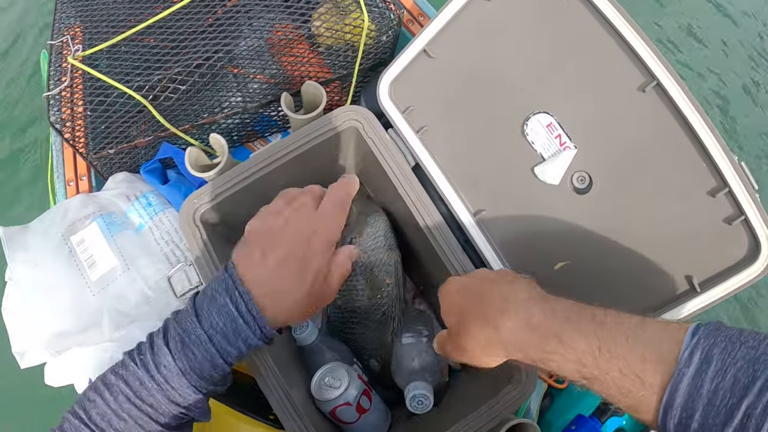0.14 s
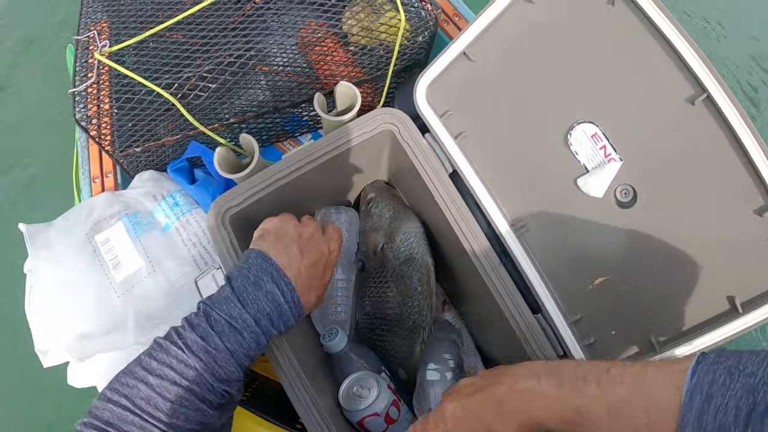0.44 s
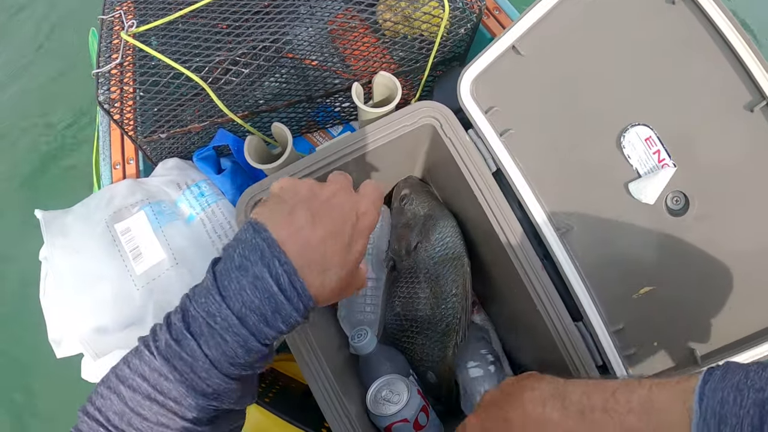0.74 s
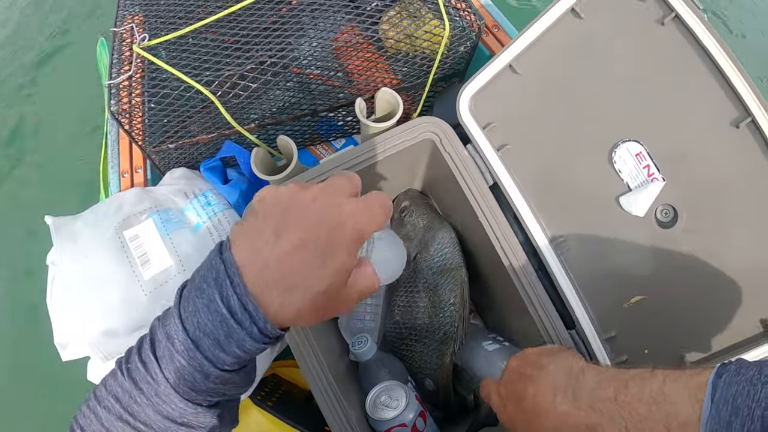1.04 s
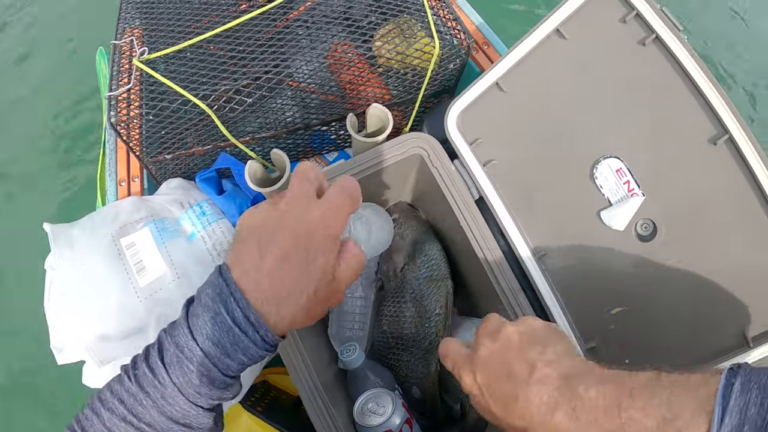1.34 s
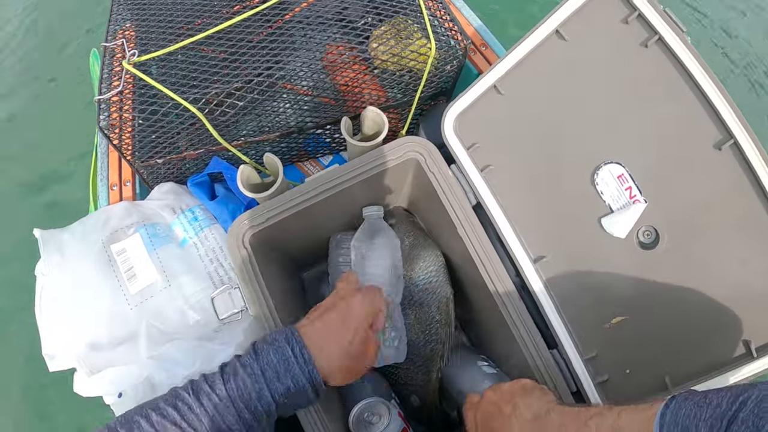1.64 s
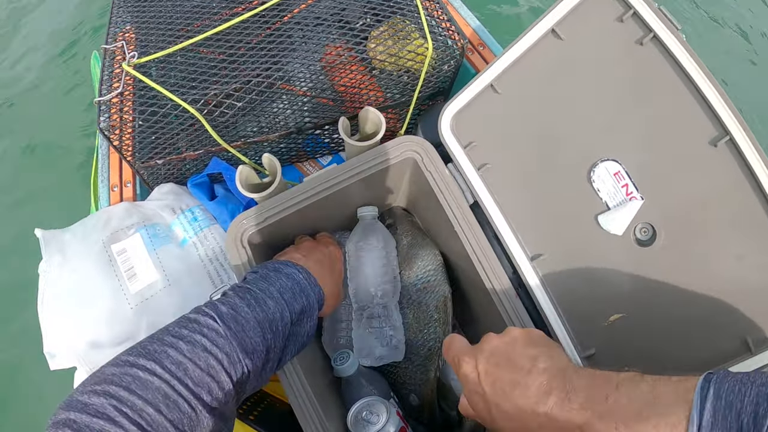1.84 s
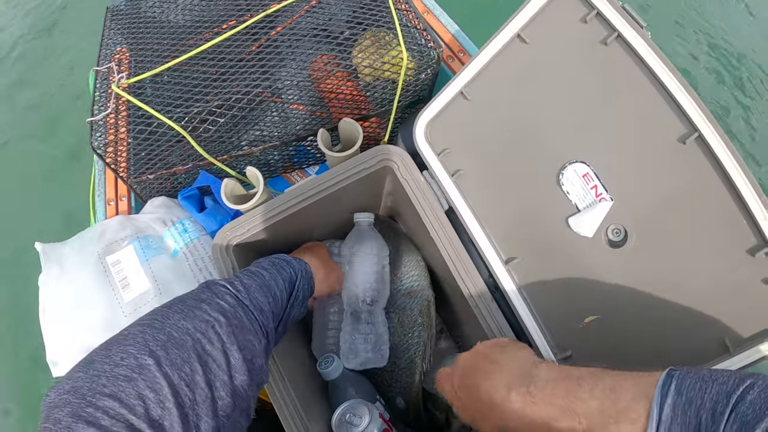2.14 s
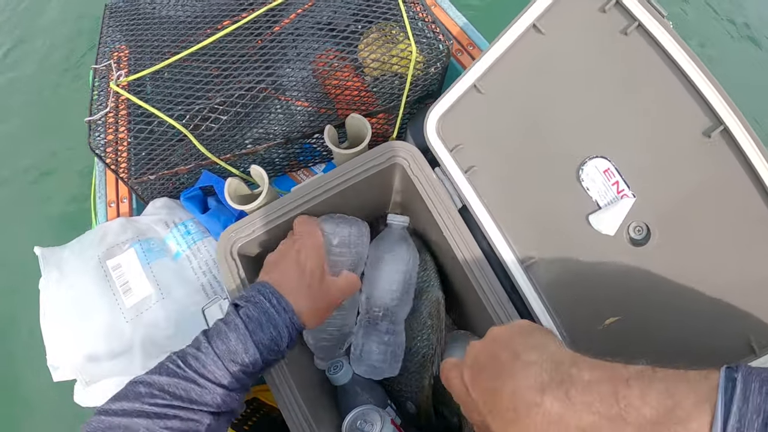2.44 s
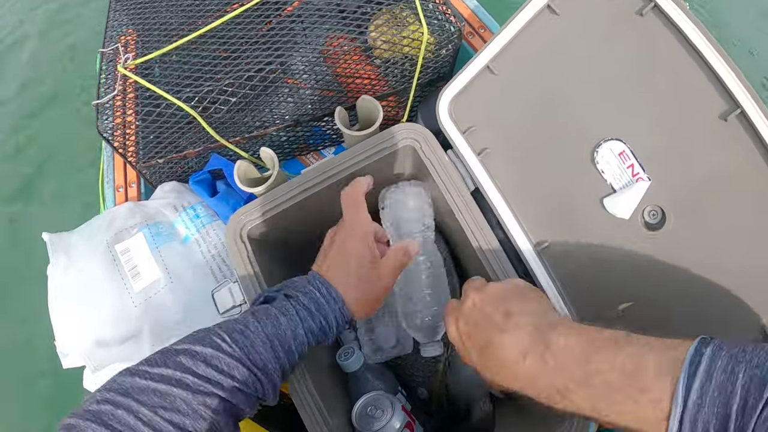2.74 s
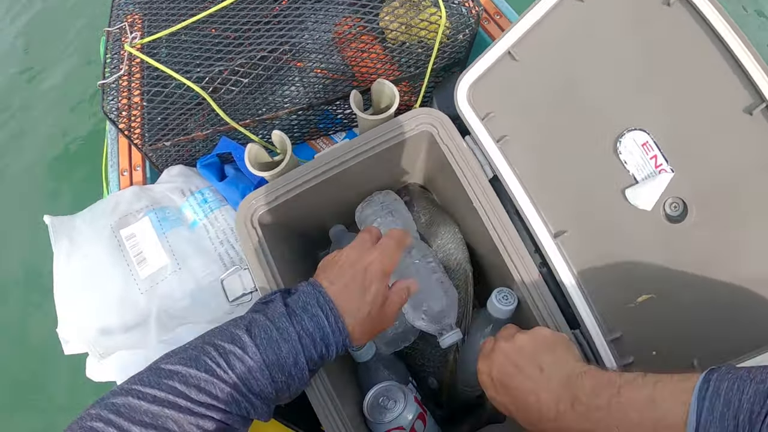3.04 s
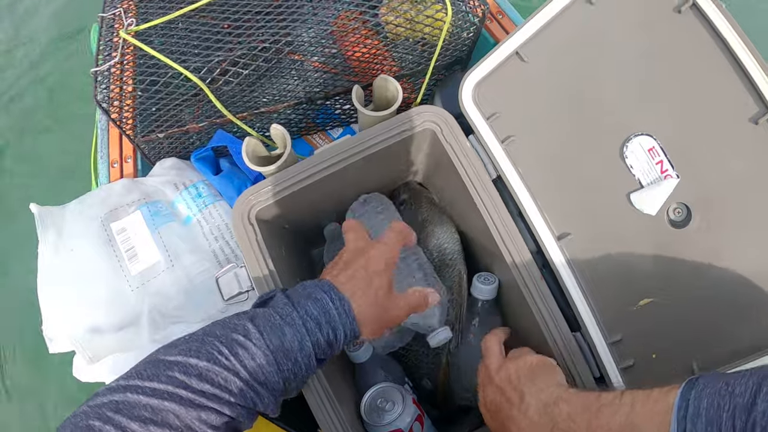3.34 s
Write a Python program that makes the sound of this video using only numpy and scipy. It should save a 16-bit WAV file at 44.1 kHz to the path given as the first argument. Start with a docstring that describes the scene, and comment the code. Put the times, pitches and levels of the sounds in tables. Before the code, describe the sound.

Crackling plastic bottles and ice shoved around a cooler, with hollow knocks and wind buffeting.

```python
"""Plastic snaps and knocks over wind rumble: hands shift frozen bottles and ice in a cooler on a small boat.
Bottle walls buckle and snap, bottles crunch over ice and knock the cooler's panels, empty ones ring hollow.
A small air pump purrs nearby; hull and water murmur below it.
Wind buffets the two microphone ports of a head-worn camera, the left one most."""
import sys
import numpy as np
from scipy import signal
from scipy.fft import rfft, irfft, next_fast_len
from scipy.io import wavfile
from scipy.ndimage import map_coordinates

SR = 44100
rng = np.random.default_rng(int(sys.argv[2]) if len(sys.argv) > 2 else 0)


def pcm_store(signal):
    """Save signal as 16-bit PCM."""
    levels = np.round(np.clip(np.atleast_2d(signal), -1, 1) * 32767)
    wavfile.write(sys.argv[1], SR, levels.astype(np.int16).T)


N = 154350

# hull and water spectrum: f/Hz, level/dB
WATER_SPECTRUM = [(18, -40), (30, -3), (130, 1), (216, -7.5), (400, -16.5), (880, -120)]
# wind strength: t/s, level/dB
GUSTS = [(0, -34), (.06, -24), (.3, -50.5), (.6, -35), (.95, -38), (1.15, -23.5), (1.32, -25), (1.52, -30),
         (1.65, -27), (1.98, -27.5), (2.2, -28.5), (2.4, -23), (2.64, -30), (2.72, -18.5), (2.95, -28.5),
         (3.05, -17.5), (3.5, -24.5)]
# turbulence spectrum at a port: f/Hz, level/dB
BUFFET_SPECTRUM = [(10, -22), (28, -1.5), (43, -2.5), (70, -8), (150, -23.5), (400, -42.5), (900, -120)]
# pump housing resonances: f/Hz, width/Hz, level/dB
HOUSING_MODES = [(100, 29, 8.5), (200, 76, 3.5), (477.6, 13.7, 6), (1074, 66, 0.5), (2990, 200, -10.5)]
# valve hiss spectrum: f/Hz, level/dB
VALVE_SPECTRUM = [(290, -62), (500, -3), (974, -7.5), (2690, -9), (16000, -42)]
# bottles sliding over ice: t/s, length/s, level/dB, treble/dB
SLIDES = [(0.162, 0.066, -25.5, -1.5), (0.432, 0.11, -33.5, -7.5), (1.562, 0.1, -31, -3.5),
          (1.606, 0.18, -22, -1), (1.764, 0.17, -37.5, -1.5), (1.92, 0.18, -42, 3), (2.217, 0.37, -34, -11),
          (2.677, 0.095, -29, -9), (2.754, 0.053, -18.5, 0.5), (2.854, 0.16, -19.5, -3.5),
          (2.987, 0.19, -23.5, -3.5), (3.091, 0.35, -35.5, 2), (3.31, 0.29, -48.5, 9)]
# ice crunch spectrum: f/Hz, level/dB
CRUNCH_SPECTRUM = [(88, -31), (150, -4.5), (341, -4.5), (514, -10.5), (1020, -11.5), (1940, -14),
                   (3490, -15.5), (12000, -37)]
# empty bottles ringing: t/s, level/dB, f/Hz
POPS = [(2.048, -18.5, 1140), (2.688, -14.5, 1485)]
# bottles hitting the cooler: t/s, level/dB, f/Hz (push, before PUSH_PITCH_RATIO), ring/dB
KNOCKS = [(0.128, -2, 200, -9.5), (0.404, -7.5, 155.3, -9.5), (0.646, -14, 555, -13),
          (1.37, -6.5, 215, -14), (1.65, -12, 204, -12), (1.978, -10, 190, -13), (2.043, -10.5, 272, -15),
          (2.061, -16, 198, -17), (2.154, -19, 222, -13), (2.261, -14, 141, -9.5), (2.543, -6, 216, -14),
          (2.611, -14.5, 196, -17.5), (2.688, -14.5, 393, -11), (2.758, -10.5, 258, -15),
          (2.799, -7, 255, -9.5), (3.014, -15, 158, -12.5)]
# cooler panel modes: f/Hz, level/dB, t60/s
COOLER_MODES = [(118, 3, 0.14), (214.6, -4, 0.13), (321, 7, 0.041), (445, -4.5, 0.072), (605, 0, 0.032)]
# bottle walls and ice snapping: t/s, level/dB, f/Hz, treble/dB, t60/s
SNAPS = [(0.1283, -3, 954, -24.5, 0.026), (0.404, -9, 946, -25, 0.038), (0.5526, -16.5, 1820, -14, 0.029),
         (0.5664, -12, 3080, -15, 0.032), (0.6397, -14, 1180, -31.5, 0.054), (0.6478, 3, 3060, -9.5, 0.018),
         (0.697, -21.5, 1120, -55, 0.013), (0.7469, -7.5, 1770, -43, 0.031),
         (0.7989, -18, 1160, -56, 0.027), (0.833, -12, 1210, -13, 0.019), (1.0037, -3, 1670, -17, 0.028),
         (1.0118, -11.5, 1680, -29, 0.016), (1.034, -19, 1560, -36, 0.064), (1.055, -4.5, 970, -12, 0.02),
         (1.1878, -18, 980, -55, 0.016), (1.291, -22.5, 2300, -36, 0.023), (1.3768, -16, 2560, -35, 0.027),
         (1.3946, -1.5, 2870, -7, 0.0077), (1.4, -4, 2380, -34, 0.026), (1.4273, -16.5, 1120, -53, 0.02),
         (1.544, -13, 2400, -5.5, 0.055), (1.5602, -7.5, 1720, -3.5, 0.028),
         (1.6192, -10.5, 1890, -46, 0.027), (1.635, -8, 1040, -51, 0.0071), (1.6515, -2.5, 1060, -16, 0.01),
         (1.6625, -2.5, 856, -7.5, 0.036), (1.6689, -3.5, 2000, -40, 0.023), (1.6958, -3, 2460, -30, 0.025),
         (1.71, -16.5, 1870, -14, 0.056), (1.7245, -15, 2230, -6.5, 0.076),
         (1.7716, -16, 1070, -17.5, 0.025), (1.9789, -21, 1620, -16, 0.021), (2.0914, -21, 960, -49, 0.022),
         (2.136, -15, 870, -15.5, 0.016), (2.195, -14, 1570, -66, 0.021), (2.2622, -18.5, 850, -65, 0.031),
         (2.287, -21, 1530, -48, 0.023), (2.321, -11.5, 1640, -53, 0.026), (2.358, -12, 2300, -39, 0.029),
         (2.3693, -4, 1480, -70, 0.023), (2.4084, -16, 1670, -27, 0.038), (2.4778, -3.5, 1500, -11, 0.025),
         (2.5586, -1.5, 1990, -33, 0.017), (2.684, -11.5, 1160, -57, 0.043),
         (2.701, -15.5, 1050, -63, 0.027), (2.7141, -18, 920, -59, 0.035), (2.7587, -11.5, 980, -39, 0.043),
         (2.774, -16, 1460, -28, 0.047), (2.798, -19.5, 1040, -56, 0.085), (2.845, -3, 1980, -13, 0.05),
         (2.8781, -6, 2050, -18, 0.078), (2.906, -9.5, 1630, -15, 0.12), (2.924, -14.5, 1240, -46, 0.072),
         (2.9549, -14, 1490, -48, 0.027), (3.034, -1, 2130, 3, 0.021), (3.045, -11, 1720, -30, 0.051),
         (3.066, -12, 2430, -1, 0.026), (3.0724, -5.5, 1740, -14, 0.056), (3.0963, -5.5, 2950, -14, 0.031),
         (3.175, -13, 1910, -17, 0.03), (3.1994, -11.5, 2070, -7.5, 0.028),
         (3.2825, -17.5, 1950, -14, 0.06), (3.2991, -1, 2690, -14, 0.028), (3.433, -14.5, 994, -26, 0.031),
         (3.481, -6.5, 2730, -10.5, 0.031)]
# left port over right: f/Hz, level/dB
PORT_TILT = [(200, 0), (700, -2.5), (2400, .5), (8000, -6), (15000, -4)]
# left port behind right: f/Hz, lag/rad
PORT_LAG = [(100, 0), (1300, .35), (3400, 1), (15000, 2.2)]

HISS_DB, WATER_DB = -54, -36.5
WIND_LEFT_DB, WIND_RIGHT_DB, LUMP_DB, LUMP_RATE_HZ = 5.5, -1, 3.5, 19
PUMP_HZ, PUMP_DB, PUMP_JITTER, PUMP_SMEAR_RAD = 52.1, -41, 0.00065, 0.61
VALVE_DB, VALVE_T60_S = -3.5, 0.1
GRAIN_RATE_HZ, GRAIN_SPREAD_DB, GRAIN_T60_S, SLIDE_RISE_SHARE = 1100, 5, 0.014, 0.3
POP_T60_S = 0.045
SINK_S, PUSH_CREST_CYCLES, PUSH_PITCH_RATIO = 0.0021, 0.69, 1.184
SNAP_Q, SNAP_RISE_S, SNAP_BROAD_DB, SNAP_TREBLE_HZ, SNAP_LOW_CUT_HZ = 9, 0.0015, -7, 4650, 477
CRACK_DB, CRACK_DELAY_S, CRACK_WIDTH_S = 2.5, 0.001202, 0.00006
SCATTER_DB, SCATTER_T60_S, SCATTER_LOW_CUT_HZ = -1, 0.01, 4500
MIC_ROLLOFF_HZ, BAND_LIMIT_HZ = 7220, 16000


def amp(db):
    """dB to gain."""
    return 10 ** (np.asarray(db) / 20)


def unit_rms(x):
    """Scale to rms 1."""
    return x / np.sqrt(np.mean(x ** 2) + 1e-20)


def log_interp(points, hz):
    """Read (f/Hz, value) points on a log axis."""
    f, value = np.transpose(points)
    return np.interp(np.log(hz + 1), np.log(f + 1), value)


def columns(table):
    """Column vectors, one row per event."""
    return np.transpose(table)[:, :, None]


def wobble(rate_hz):
    """Smooth random curve, rate_hz knots a second."""
    knots = rng.standard_normal(int(N * rate_hz / SR) + 4)
    return map_coordinates(knots, [np.arange(N) * rate_hz / SR])


def filtered(x, response):
    """Apply a complex frequency response."""
    size = next_fast_len(x.shape[-1] + 4096)
    return irfft(rfft(x, size) * response(np.fft.rfftfreq(size, 1 / SR)), size)[..., :x.shape[-1]]


def resonance(f, hz, width_hz):
    """Causal band-pass response."""
    return 1j * f * width_hz / (hz * hz - f * f + 1j * f * width_hz)


def coloured(x, spectrum):
    """Shape by (f/Hz, level/dB) points, rms 1."""
    return unit_rms(filtered(x, lambda f: amp(log_interp(spectrum, f))))


def place(starts_s, sounds):
    """Sum short sounds into the track."""
    index = np.round(starts_s * SR).astype(int).reshape(-1, 1) + np.arange(sounds.shape[1])
    return np.bincount(index.ravel(), sounds.ravel(), N + sounds.shape[1])[:N]


def water():
    """Low, steady murmur of hull and water."""
    return amp(WATER_DB) * coloured(rng.standard_normal(N), WATER_SPECTRUM)


def wind():
    """Lumpy low buffeting, different at each port."""
    gust_db = np.interp(np.arange(N) / SR, *np.transpose(GUSTS))
    return np.array([amp(gust_db + port_db + LUMP_DB * wobble(LUMP_RATE_HZ))
                     * coloured(rng.standard_normal(N), BUFFET_SPECTRUM)
                     for port_db in (WIND_LEFT_DB, WIND_RIGHT_DB)])


def pump():
    """One stroke a turn shakes the housing, overtones out of step; the valve hisses with each stroke."""
    turns = np.cumsum(PUMP_HZ * (1 + PUMP_JITTER * wobble(6.6))) / SR
    strokes = np.diff(np.floor(turns), prepend=0)
    overtone_rad = PUMP_SMEAR_RAD * rng.standard_normal(SR // 100)

    def housing(f):
        modes = sum((-1) ** k * amp(db) * resonance(f, hz, width_hz)
                    for k, (hz, width_hz, db) in enumerate(HOUSING_MODES))
        phase_rad = np.interp(f / PUMP_HZ, np.arange(len(overtone_rad)), overtone_rad)
        return modes / (1 + (f / 4000) ** 4) * np.exp(1j * phase_rad)

    purr = unit_rms(filtered(strokes, housing))
    puffs = amp(-60 * (turns % 1) / PUMP_HZ / VALVE_T60_S) + 0.075
    valve = coloured(puffs * rng.standard_normal(N), VALVE_SPECTRUM)
    return amp(PUMP_DB) * (purr + amp(VALVE_DB) * valve)


def ice_crunch():
    """Dense tiny fractures and scrapes swell and fade with each slide; bare ice scrapes brighter."""
    t = np.arange(N) / SR
    fractures = (rng.random(N) < GRAIN_RATE_HZ / SR) * amp(GRAIN_SPREAD_DB * rng.standard_normal(N))
    envelope = signal.fftconvolve(fractures, amp(-60 * t[:SR // 20] / GRAIN_T60_S))[:N]
    grains = coloured(envelope * rng.standard_normal(N), CRUNCH_SPECTRUM)
    treble = filtered(grains, lambda f: f ** 2 / (f ** 2 + 2500 ** 2))
    track = np.zeros(N)
    for start_s, length_s, db, treble_db in SLIDES:
        swell = np.interp(t - start_s, [0, SLIDE_RISE_SHARE * length_s, length_s], [0, 1, 0])
        track += amp(db) * swell * (grains - treble + amp(treble_db) * treble)
    return track


def bottle_pops():
    """The air in an empty bottle rings briefly."""
    start_s, db, hz = columns(POPS)
    t = np.arange(SR // 4) / SR
    return place(start_s, amp(db - 60 * t / POP_T60_S) * np.sin(2 * np.pi * hz * t))


def cooler_knocks():
    """The panel gives, swings hard for a cycle or two, then its modes ring on."""
    start_s, db, hz, ring_db = columns(KNOCKS)
    t = np.maximum(np.arange(SR // 4) / SR - SINK_S, 0)
    cycles = t * hz * PUSH_PITCH_RATIO
    age = cycles / PUSH_CREST_CYCLES
    push = np.sin(2 * np.pi * cycles) * age ** 2 * np.exp(2 * (1 - age))
    # each spot of the loaded panel rings differently
    spread_db = rng.normal(0, 1.7, (len(KNOCKS), len(COOLER_MODES)))
    detune = 1 + 0.037 * rng.standard_normal(spread_db.shape)
    ring = sum(amp(mode_db + spread_db[:, [k]] - 60 * t / t60_s)
               * np.sin(2 * np.pi * mode_hz * detune[:, [k]] * t)
               for k, (mode_hz, mode_db, t60_s) in enumerate(COOLER_MODES))
    onset = 1 - np.exp(-(t / 0.0023) ** 2)
    return place(start_s, amp(db) * (push + amp(ring_db) * ring * onset))


def bottle_snaps():
    """The wall flips in one jerk; that crack and a dying splinter of noise ring it at its pitch."""
    start_s, db, hz, treble_db, t60_s = columns(SNAPS)
    t = np.arange(SR // 10) / SR
    envelope = amp(-60 * t / t60_s) * (1 - np.exp(-t / SNAP_RISE_S))
    splinter = envelope * rng.standard_normal(envelope.shape)
    crack = amp(CRACK_DB) * np.exp(-((t - CRACK_DELAY_S) / CRACK_WIDTH_S) ** 2)

    def wall(f):
        main_mode = resonance(f, hz, hz / SNAP_Q)
        broad_body = amp(SNAP_BROAD_DB) * resonance(f, 1.84 * hz, 1.9 * hz) ** 2
        low_mode = amp(-9) * resonance(f, 0.6 * hz, 0.23 * hz)
        edge = amp(treble_db) * resonance(f, SNAP_TREBLE_HZ, SNAP_TREBLE_HZ)
        low_cut = (1j * f / (SNAP_LOW_CUT_HZ + 1j * f)) ** 2
        return (main_mode - broad_body + low_mode + edge) * low_cut

    snaps = filtered(splinter + crack, wall)
    return place(start_s, amp(db) * snaps / np.abs(snaps).max(axis=1, keepdims=True))


def scatter(x):
    """Short treble reflections, changing every 20 ms as hands and bottles move."""
    size = SR // 50
    blocks = np.pad(x, (0, -N % size)).reshape(-1, size)
    tails = rng.standard_normal(blocks.shape) * amp(-60 * np.arange(size) / SR / SCATTER_T60_S)
    tails /= np.linalg.norm(tails, axis=1, keepdims=True)
    wet = place(np.arange(len(blocks)) * size / SR, signal.fftconvolve(blocks, tails, axes=1))
    return filtered(wet, lambda f: (1j * f / (SCATTER_LOW_CUT_HZ + 1j * f)) ** 2)


def mic_ports(x):
    """Sound reaches the right port first; each port hears its own scatter."""
    side = np.array([[0.5], [-0.5]])  # left, right
    pair = x + amp(SCATTER_DB) * np.array([scatter(x), scatter(x)])
    return filtered(pair, lambda f: amp(side * log_interp(PORT_TILT, f))
                    * np.exp(-1j * side * log_interp(PORT_LAG, f)))


def scene():
    """Near sources through the ports, plus wind and microphone self-noise."""
    near = water() + bottle_snaps() + cooler_knocks() + bottle_pops() + ice_crunch() + pump()
    return mic_ports(near) + wind() + amp(HISS_DB) * rng.standard_normal((2, N))


def record(dry):
    """The microphone dulls the top; the camera clips at full scale and limits the band."""
    dulled = filtered(dry, lambda f: 1 / (1 + 1j * f / MIC_ROLLOFF_HZ) ** 2 / (1 + (f / 13000) ** 6))
    return filtered(np.clip(dulled, -1, 1), lambda f: f < BAND_LIMIT_HZ)


dry = scene()
out = record(dry)
pcm_store(out)
```